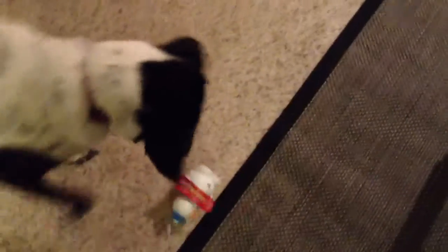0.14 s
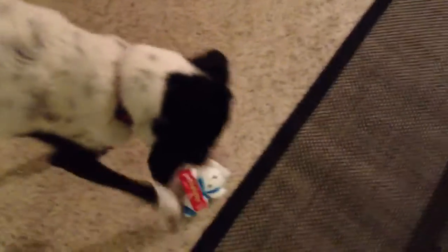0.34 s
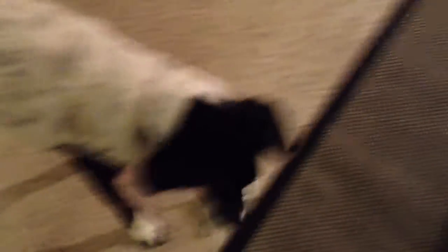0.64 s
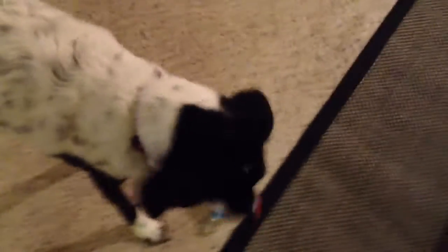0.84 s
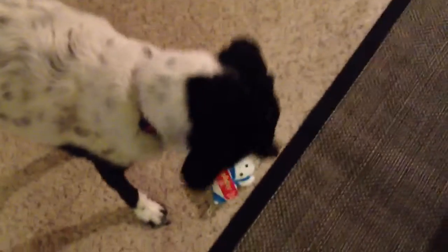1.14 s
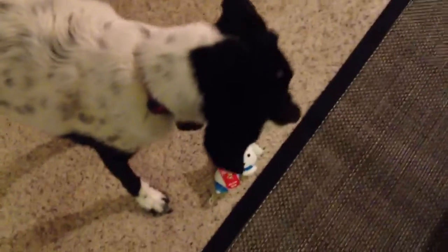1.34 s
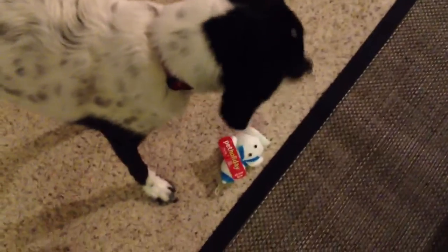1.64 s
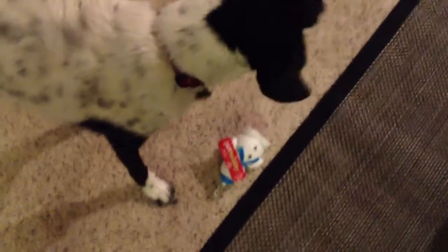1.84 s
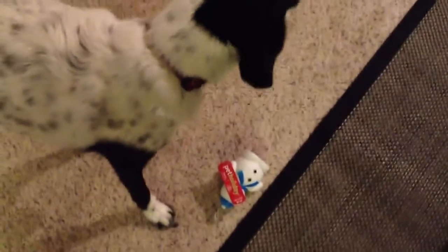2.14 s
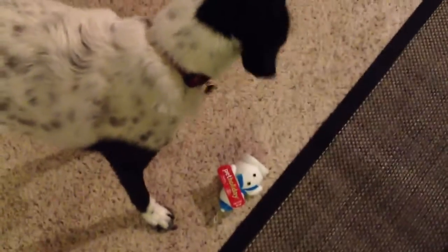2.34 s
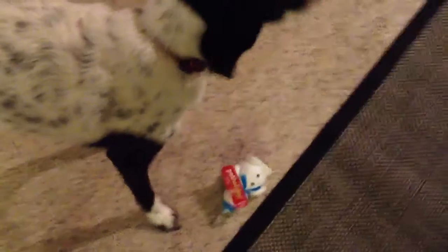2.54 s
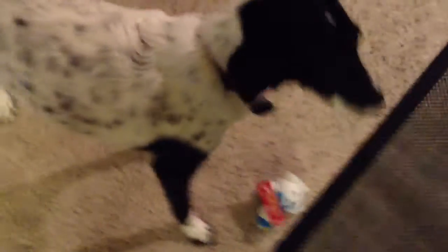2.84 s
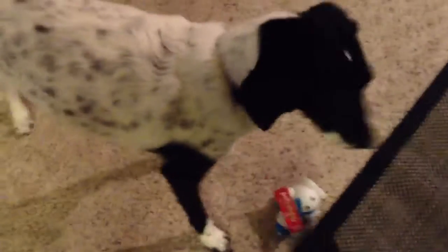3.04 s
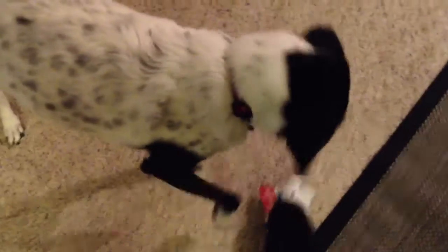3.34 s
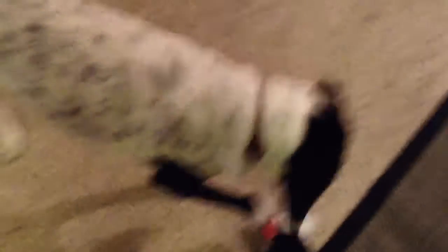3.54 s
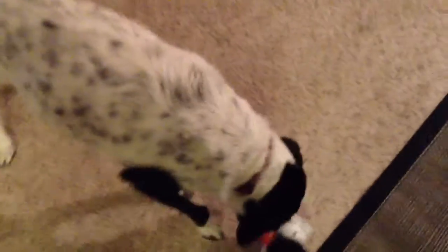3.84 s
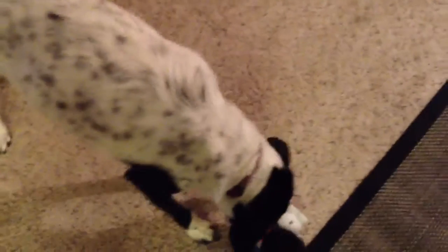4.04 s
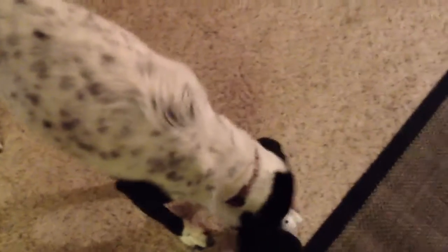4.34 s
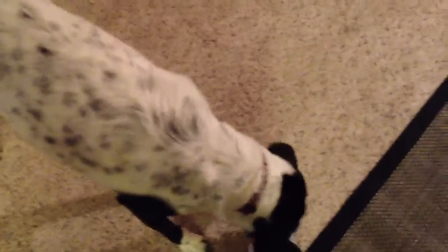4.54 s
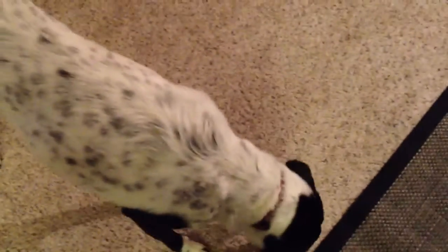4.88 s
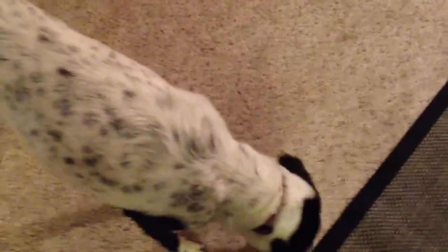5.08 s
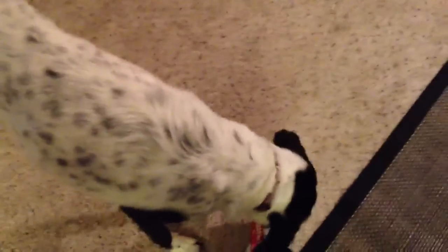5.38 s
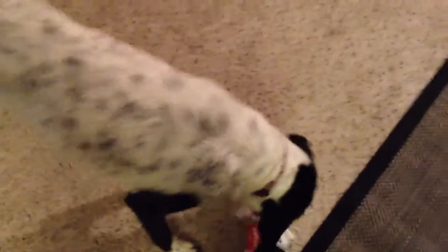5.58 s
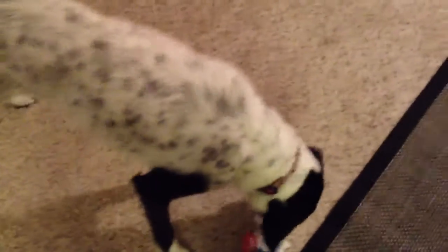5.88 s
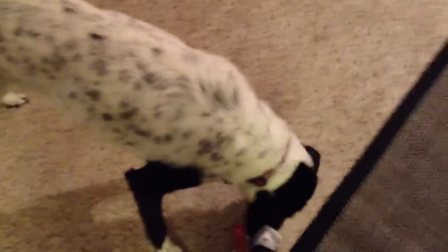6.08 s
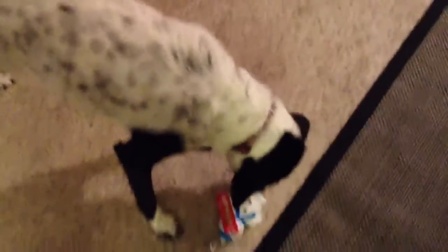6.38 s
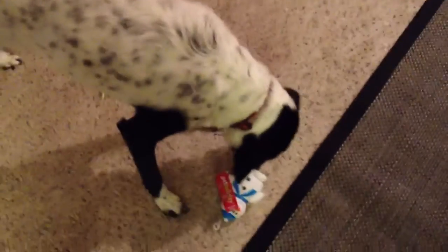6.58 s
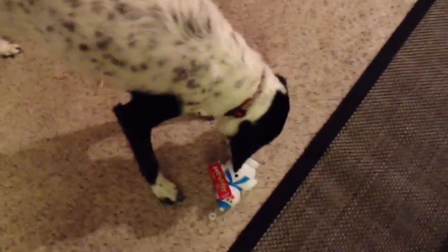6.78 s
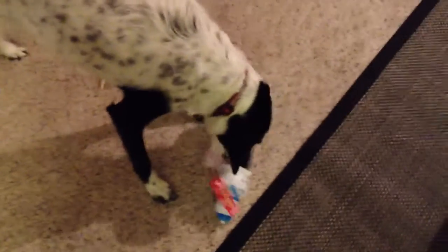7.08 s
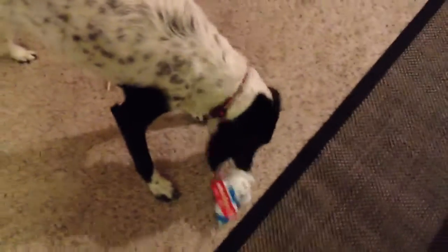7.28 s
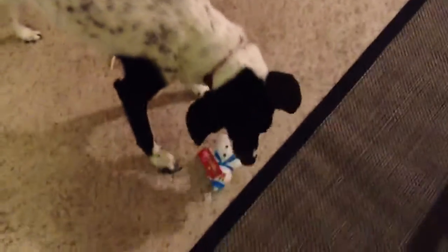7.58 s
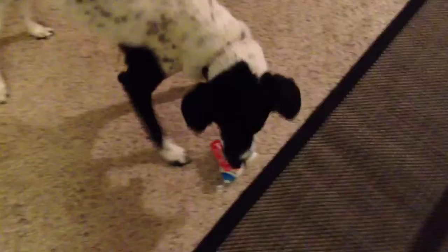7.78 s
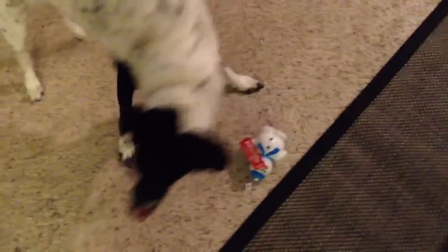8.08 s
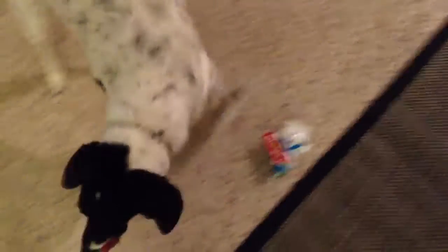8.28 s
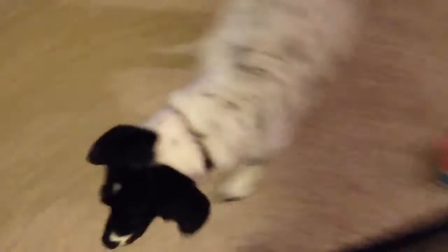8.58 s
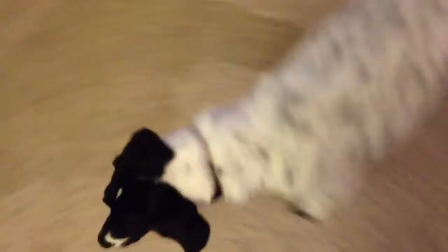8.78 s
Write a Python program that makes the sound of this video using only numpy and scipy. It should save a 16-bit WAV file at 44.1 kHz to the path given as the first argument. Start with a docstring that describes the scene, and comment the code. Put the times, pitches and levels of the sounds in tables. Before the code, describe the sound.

A quiet carpeted living room, heard close on a phone, with a soft low fan hum throughout and a short room echo. At 0 s the tail of a toy squeak dies away. From 0.8 s collar tags clink lightly and a dog whines: a longer, louder, cracking call at 0.9-1.2 s, then falling whines near 1.5, 2.0 and 2.5 s and a weaker one at 2.9 s. Most begin with a thin nasal whistle around 3 kHz before dropping into voice. Tags tinkle between them until 3.1 s. From 3.2 to 6.2 s a plastic squeaker is chewed in quick uneven bursts, outward squeals alternating with inward peeps, pausing around 4.5-4.8 s; a whine overlaps at 4.9 s. The last inward squeak sings at 6.0 s. Tiny whimpers follow at 6.5 and 6.8 s, longer ones at 7.2 and 7.8 s, and a brighter rough pair at 8.1-8.4 s, with soft huffs, rustle and faint tag clinks to the end.

```python
"""The tail of a toy's squeak opens over a quiet house hum; then collar tags clink and a dog starts to whine.
Most whines open as a thin nasal whistle and break into a lower voice with a strong fundamental and cracks.
The toy is squeezed again and again: its reed squeals on presses and sings as air is drawn back in.
Tags are short noise over ringing modes; huffs and coat rustle are swells of noise.
Dog and toy sit in a carpeted living room, with early reflections and a diffuse tail."""
import sys
import numpy as np
from scipy import signal
from scipy.fft import rfft, irfft
from scipy.io import wavfile

SR = 44100
rng = np.random.default_rng(int(sys.argv[2]) if len(sys.argv) > 2 else 0)


def unload_wav(signal):
    """Save mono or channel-first audio to the path in sys.argv[1] as 16-bit WAV at rate SR, clipped to [-1, 1]."""
    wavfile.write(
        sys.argv[1],
        SR,
        np.round(np.clip(np.atleast_2d(signal).T, -1, 1) * 32767).astype(np.int16),
    )


N = 393372
T = np.arange(N) / SR


def undb(db):
    """Decibels to gain."""
    return 10 ** (np.asarray(db) / 20)


def rms(x):
    """Root mean square, kept above zero."""
    return np.sqrt(np.mean(x ** 2)) + 1e-12


def colour(hz, points):
    """Gain at the given frequencies, from (f/Hz, level/dB) points joined on a log frequency axis."""
    f, db = np.transpose(points)
    return undb(np.interp(np.log(hz + 1), np.log(f), db))


def noise(points, size):
    """Noise of unit RMS with the given spectral shape."""
    spectrum = rfft(rng.standard_normal(size))
    x = irfft(spectrum * colour(np.fft.rfftfreq(size, 1 / SR), points), size)
    return x / rms(x)


def wander(t, rate):
    """Random wavering: straight lines between normal random values, `rate` of them a second."""
    values = rng.standard_normal(2048)
    return np.interp((t - t[0]) * rate, np.arange(len(values)), values)


def gate(t, start, end, attack, release):
    """Smooth opening from the start and closing after the end."""
    opened = np.minimum((t - start) / attack, 1 + (end - t) / release)
    return np.sin(np.pi / 2 * np.clip(opened, 0, 1)) ** 2


def note(start, length, attack, release):
    """Sample span, times, gate and progress (0 to 1) of one call."""
    onset = start - attack / 2
    span = (T > onset) & (T < start + length + release)
    t = T[span]
    progress = np.clip((t - start) / length, 0, 1)
    return span, t, gate(t, onset, start + length, attack, release), progress


def phase_of(hz):
    """Running phase of a moving pitch."""
    return 2 * np.pi * np.cumsum(hz) / SR


def arc(u, first, middle, last):
    """Smooth bow through three values as u runs from 0 to 1."""
    return first * (1 - u) * (1 - 2 * u) + middle * 4 * u * (1 - u) + last * u * (2 * u - 1)


# quiet of the house, spectral shape: [f/Hz, relative level/dB]
HOUSE_COLOUR = [(25, -31), (60, -26.5), (100, -20), (125, -9.5), (240, -1), (300, -7), (400, -12.5),
                (520, -14), (700, -15), (1800, -20.5), (5000, -24.5), (7500, -23.5), (10000, -32),
                (14500, -26)]
# hum of a running fan: [f/Hz, level/dB]
FAN_HUM = [(120, -81.5), (150, -73.5), (173, -69.5)]


def house(air_db=-63.5, air_waver_db=2.1):
    """Moving air as shaped noise, plus fan tones whose level and phase waver at random."""
    hum = np.zeros(N)
    for hz, db in FAN_HUM:
        sine_part = wander(T, 24) * np.sin(2 * np.pi * hz * T)
        cosine_part = wander(T, 13) * np.cos(2 * np.pi * hz * T)
        hum += undb(db) * (sine_part + cosine_part)
    return noise(HOUSE_COLOUR, N) * undb(air_db + air_waver_db * wander(T, 6)) + hum


# the toy refills: [start t/s, rise t/s, fall t/s, first f/Hz, top f/Hz, last f/Hz, level/dB before the mix]
TOY_REFILLS = [ (-.060, 0.038, 0.094, 1150, 1233, 907, -26), (3.695, 0.043, 0.056, 1110, 1171, 1044, -34.5),
               (3.920, 0.036, 0.13, 1124, 1180, 975, -34), (4.305, 0.038, 0.19, 1100, 1237, 942, -31),
               (4.980, 0.016, 0.043, 1070, 1125, 1045, -37.5), (5.145, 0.01, 0.021, 950, 1050, 960, -58),
               (5.295, 0.0083, 0.05, 1100, 1120, 1000, -38.5),
               (5.437, 0.016, 0.029, 1110, 1146, 986, -35.5),
               (5.600, 0.017, 0.012, 1074, 1064, 1060, -39.5), (5.735, .015, 0.02, 940, 950, 930, -56),
               (5.998, 0.045, 0.22, 1129, 1251, 925, -30)]
# presses of the toy: [same columns as the refills]
TOY_PRESSES = [ (3.240, 0.022, 0.015, 848, 942, 872, -41), (3.557, 0.046, 0.049, 959, 1105, 899, -28),
               (3.803, 0.042, 0.042, 978, 1150, 931, -26.5), (4.088, 0.035, 0.066, 990, 1399, 854, -24),
               (4.215, 0.037, 0.034, 970, 1028, 949, -32.5), (4.852, 0.036, 0.053, 995, 1072, 886, -29.5),
               (5.055, 0.029, 0.033, 984, 1029, 908, -32), (5.208, 0.029, 0.039, 973, 1065, 892, -31.5),
               (5.375, 0.0065, 0.012, 920, 945, 840, -37.5), (5.502, 0.039, 0.033, 962, 1119, 909, -28),
               (5.652, 0.024, 0.023, 986, 1024, 910, -30), (5.797, 0.013, 0.021, 1046, 998, 912, -32),
               (5.904, 0.047, 0.029, 1016, 1161, 994, -25)]
# overtone colour of the squeaker, blown inwards: [f/Hz, level/dB]
INWARD_COLOUR = [(1100, -7), (2400, -9), (3600, -8.5), (4700, -7), (5900, -15), (7100, -0.5), (8400, -1.5),
                 (9500, -2), (10700, -7.5), (11800, -20.5), (13000, -14), (15500, -26.5)]
# overtone colour of the squeaker, blown outwards: [f/Hz, level/dB]
OUTWARD_COLOUR = [(1000, -9.5), (2100, -16), (3200, -11.5), (4300, -5.5), (5300, -8), (6500, 3.5),
                  (7500, -2.5), (8700, -6.5), (10000, -15.5), (11000, -13.5), (11800, -25), (13500, -23),
                  (15500, -25)]


def squeaker(strokes, points, rise_shape, fall_shape, swell_db, bright_db, flutter, hiss_db,
             uneven_db, force_tilt):
    """A plastic reed: the air pressure of each stroke lifts its pitch, level and brightness together."""
    hiss_colour = [(500, -56), (2500, -23.5), (4500, -5.5), (6700, 2.5), (9000, -3.5), (15000, -26)]
    out = np.zeros(N)
    for start, rise, fall, first_hz, top_hz, last_hz, db in strokes:
        top = start + rise
        span = (T >= start) & (T < top + fall + .01)
        t = T[span]
        rising = t < top
        rise_slack = (abs(top - t) / rise) ** rise_shape
        fall_slack = (abs(t - top) / fall) ** fall_shape
        slack = np.where(rising, rise_slack, fall_slack)
        hz = top_hz - slack * (top_hz - np.where(rising, first_hz, last_hz))
        # pressure lost against the top of the stroke
        sag = np.minimum(slack, 1) * np.where(rising, .6, 1)
        # the reed starts clean, then flutters in the turbulent flow
        unsteady = np.minimum((t - start) / .05, 1)
        phase = phase_of(hz * (1 + flutter * unsteady * wander(t, 700)))
        reed = 0
        for k in range(1, 15):
            # the reed's swing is limited: a harder stroke feeds the upper overtones more than the lowest
            force_db = force_tilt * (db + 23) * min(np.log2(k / 5), 0)
            partial_db = uneven_db * wander(t, 43.3) - bright_db * sag * np.log2(k) + force_db
            partial = np.sin(k * phase + rng.uniform(0, 2 * np.pi))
            reed = reed + colour(k * hz, points) * undb(partial_db) * partial
        hiss = undb(hiss_db) * unsteady * noise(hiss_colour, len(t))
        opening = gate(t, start - .001, top + fall, .005, .01)
        out[span] += opening * undb(db - swell_db * sag) * (reed + hiss)
    return out


# collar tags touch: [t/s, level/dB before the gain]
TAG_TOUCHES = [(0.7775, -48.5), (0.861, -58), (1.04, -43), (1.1227, -41.5), (1.407, -60), (1.6125, -44),
               (1.7315, -53), (1.8267, -48), (2.3284, -45), (2.7285, -41.5), (2.9756, -52.5), (3.0614, -52),
               (3.1358, -58), (4.754, -57), (7.049, -61), (7.432, -53), (7.6655, -56), (8.445, -48.5),
               (8.8964, -51)]
# ringing modes of the tags: [f/Hz, level/dB, 60 dB decay t/s]
TAG_RING = [(6400, -8, .08), (7150, -4, .08), (8150, -4, .08), (9050, -4, .1), (10100, -2, .12),
            (11200, -9, .07), (12200, 0, .13), (13600, -11, .07), (14900, -7, .07)]


def tags(gain_db, tick_db, tick_s=0.014, touch_s=0.0013):
    """Small metal tags: a short scrape of noise and a few decaying high modes share a softened onset."""
    tick_colour = [(1000, -36.5), (4000, -6.5), (8000, 14), (15000, -1)]
    out = np.zeros(N + SR)
    t = T[:SR // 5]
    for s, db in TAG_TOUCHES:
        ring = 0
        for hz, mode_db, t60 in TAG_RING:
            # each touch excites the modes unequally
            decay_db = mode_db + 5.3 * rng.standard_normal() - 60 * t / t60
            ring = ring + undb(decay_db) * np.sin(2 * np.pi * hz * t)
        tick = noise(tick_colour, len(t)) * np.exp(-t / tick_s)
        hit = (ring / 2 + undb(tick_db) * tick) * (1 - np.exp(-t / touch_s))
        first = int(s * SR)
        out[first:first + len(t)] += undb(db + gain_db) * hit
    return out[:N]


# thin whistling lines of the whines, levels before swell and mix:
# [start t/s, length t/s, first f/Hz, middle f/Hz, last f/Hz, fundamental level/dB, upper partials level/dB]
WHISTLE_LINES = [ (0.783, 0.1, 3527, 3600, 3473, -56.5, -62), (0.937, 0.22, 3975, 4010, 3620, -56.5, -68.5),
                 (1.403, 0.088, 3250, 3500, 3420, -52.5, -51), (1.863, 0.12, 3120, 3295, 3305, -56, -53),
                 (2.334, 0.14, 3047, 3325, 3193, -53.5, -49), (2.825, 0.11, 3166, 3260, 3250, -57, -54),
                 (2.963, 0.31, 3180, 3320, 3410, -75, -83), (6.512, 0.036, 3366, 3410, 3310, -61.5, -85),
                 (6.739, 0.098, 3210, 3415, 3290, -60.5, -78), (7.19, 0.031, 3450, 3540, 3570, -52.5, -86),
                 (7.71, 0.058, 3370, 3465, 3320, -54.5, -55.5), (7.79, 0.023, 4520, 4290, 4280, -51.5, -75),
                 (8.12, 0.058, 3440, 3400, 3330, -57, -80), (8.211, 0.056, 3550, 3540, 3580, -48.5, -85),
                 (8.293, 0.1, 3620, 3600, 3795, -52.5, -63)]


def whistle(jitter=0.005, third_db=-15, fourth_db=-17):
    """Thin, high whistling lines of a whine; those at 0.937 and 7.79 s lie near the voice's fifth harmonic."""
    out = np.zeros(N)
    for start, length, first_hz, middle_hz, last_hz, db, upper_level_db in WHISTLE_LINES:
        span, t, opening, u = note(start, length, attack=0.0037, release=0.011)
        hz = arc(u, first_hz, middle_hz, last_hz)
        swell = undb(-arc(u, 5.55, 0, 6.975))  # dB quieter at the start and end than in the middle
        phase = phase_of(hz * (1 + jitter * wander(t, 221.5)))
        upper = np.sin(2 * phase) + undb(third_db) * np.sin(3 * phase)
        upper = upper + undb(fourth_db) * np.sin(4 * phase)
        out[span] += opening * swell * (undb(db) * np.sin(phase) + undb(upper_level_db) * upper)
    return out


# whines, levels before the mix: [start t/s, length t/s, attack t/s, first f/Hz, middle f/Hz, last f/Hz,
# catch at the onset f/Hz, final drop f/Hz, fundamental level/dB, fade over the note level/dB,
# push t/s, push level/dB, overtones level/dB before a trim, brightness level/dB per octave]
DOG_WHINES = [ (0.872, 0.3, 0.022, 764, 808.2, 723, 78, 223, -33.5, 2, 1.02, 14, -45.5, -5.5),
              (1.497, 0.13, 0.011, 997, 757, 440, 0, 3, -34.5, -2.5, 1.505, 8, -49, -3),
              (1.955, 0.157, 0.015, 943, 738, 452, 1.5, -5.5, -36, 9, 2.09, 12.5, -47, -4.5),
              (2.459, 0.17, 0.012, 965, 661.5, 424.3, 21.5, 5, -34, -6, 2.485, 8.5, -49.5, -1),
              (2.913, 0.24, 0.011, 641, 573, 537, 183, 15.5, -43, 5, 3.09, 11.5, -58, -0.5),
              (4.873, 0.18, 0.02, 558.6, 559.7, 505, -150, 78, -44, 5, 4.92, 11.5, -56.5, -1.5),
              (6.51, 0.021, 0.012, 558, 553, 567, 6, 7, -63, 1, 6.522, 6, -89, 2),
              (6.836, 0.042, 0.0139, 543, 535, 519, 0, 2, -49.5, 0, 6.855, 1.5, -72.5, 4),
              (7.229, 0.22, 0.061, 708, 494.5, 409.6, -10, -4.5, -41.5, 8, 7.275, 1.5, -60.5, -1.5),
              (7.794, 0.24, 0.016, 755.5, 656.5, 590, 201, 2, -41.5, 11, 7.95, 11, -50.5, -0.5),
              (8.143, 0.041, 0.012, 636, 606, 648, 71, 3.5, -35, -3, 8.17, 3.5, -50, -5.5),
              (8.236, 0.124, 0.005, 693, 664.8, 722.4, 2, 0, -41.5, -6.5, 8.245, 8.5, -43.5, -7)]
# the voice cracks: [centre t/s, bell half width t/s, roughness 0-1]
VOICE_CRACKS = [(0.971, 0.015, 0.4), (1.108, 0.013, .3), (1.153, 0.0051, 0.2), (1.181, 0.022, 0.6),
                (1.62, 0.024, 0.34), (2.09, 0.0091, 0.5), (2.567, 0.013, 0.13), (2.634, 0.011, 0.31),
                (3.14, 0.012, 0.17), (7.42, 0.035, 0), (8.244, 0.0056, 0.7), (8.303, 0.012, 0.4),
                (8.35, 0.012, 0.83)]
# muzzle colour of the overtones and breath: [f/Hz, level/dB]
MUZZLE_COLOUR = [(100, -50), (350, -13.5), (700, 6), (1020, 4.5), (1250, -3), (1550, -2.5), (2050, -6),
                 (2600, -7), (3300, -13), (4300, -7.5), (5500, -17.5), (7400, -9.5), (9000, -28),
                 (14000, -41)]


def voice(jitter=0.0089, crack_jitter=0.056, half_db=2.5, air_db=-25, uneven_db=5, thin_db=7,
          dull_db=3, shimmer_db=7):
    """Vocal folds in falsetto: a strong fundamental, weak overtones, and period doubling in the cracks."""
    catch_s, drop_s, push_s = .012, .02, .024  # time scales of throat catch, final pitch drop and push
    push_overtone_share = 0.31  # share of a push, in dB, that the overtones follow
    breathy_hz = 7200  # an overtone here wavers in phase by about a radian
    out = np.zeros(N)
    for (start, length, attack, first_hz, middle_hz, last_hz, catch_hz, drop_hz, level_db, fade_db,
         push_at, push_db, upper_db, bright_db) in DOG_WHINES:
        span, t, opening, u = note(start, length, attack, release=0.006)
        # the catch in the throat settles; the pitch bends at the end as the breath runs out
        catch = catch_hz * np.exp(-u * length / catch_s)
        drop = drop_hz * np.exp((u - 1) * length / drop_s)
        hz = arc(u, first_hz, middle_hz, last_hz) + catch - drop
        push = push_db * np.exp(-((t - push_at) / push_s) ** 2)
        db = level_db - fade_db * (u - .5) + push
        # the mouth opens mid-whine: overtones are 2.5 dB weaker at the start and 1 dB at the end
        overtone_db = upper_db - 2.5 + push_overtone_share * push - arc(u, 2.5, 0, 1)
        mouth_db = bright_db + 12.5 * np.log2(hz / middle_hz)  # duller as the pitch falls
        rough = sum(amount * np.exp(-((t - s) / width) ** 2) for s, width, amount in VOICE_CRACKS)
        height = np.maximum(np.log2(hz / 520), 0)  # the higher the note, the nearer it is to a pure tone
        hz = hz * (1 + jitter * wander(t, 126.3) + crack_jitter * rough * wander(t, 500))
        phase = phase_of(hz)
        overtones = 0
        for k in range(2, 15):
            # each overtone comes and goes as the head and lips move
            partial_db = uneven_db * wander(t, 42.2) - height * (thin_db + dull_db * np.log2(k / 2))
            # an open mouth lets the treble out
            partial_db = partial_db + mouth_db * np.log2(k * hz / 1800)
            # the highest overtones dissolve into breath
            smear = (k * hz / breathy_hz) ** 2 * wander(t, 500)
            partial = np.sin(k * phase + smear)
            overtones = overtones + colour(k * hz, MUZZLE_COLOUR) * undb(partial_db) * partial
        # period doubling: odd multiples of half the pitch
        halves = 0
        for k in range(1, 9, 2):
            half_gain = colour(k * hz / 2, MUZZLE_COLOUR) * min(1, (3 / k) ** 2)
            halves = halves + half_gain * np.sin(k * phase / 2)
        air = (undb(-3) * rough + undb(air_db)) * noise(MUZZLE_COLOUR, len(t))
        upper = overtones + undb(half_db) * rough * halves + air
        shimmer = undb(shimmer_db * rough * wander(t, 200))
        out[span] += opening * shimmer * (undb(db) * np.sin(phase) + undb(overtone_db) * upper)
    return out


# the dog's huffs and the rustle of its coat:
# [centre t/s, bell half width t/s, centre f/Hz, level/dB before the mix]
DOG_HUFFS = [(1.782, 0.045, 2010, -77), (2.238, .04, 2300, -74), (7.978, 0.14, 6200, -65),
             (8.354, .05, 7050, -58.5), (8.835, 0.27, 12000, -69)]


def huffs():
    """Soft, broad swells of air and fur noise."""
    out = np.zeros(N)
    for s, width, hz, db in DOG_HUFFS:
        span = abs(T - s) < 3 * width
        swell = np.exp(-((T[span] - s) / width) ** 2)
        points = [(hz / 20, -40), (hz / 2, -6), (hz, 0), (hz * 2, -14), (hz * 10, -40)]
        out[span] += undb(db) * swell * noise(points, span.sum())
    return out


# first reflections from floor, couch and walls: [delay t/s, level/dB]
EARLY_ECHOES = [(.0031, -33), (.0083, -10), (.0137, -17.5), (.0212, -13)]
# reverberation of the room: [f/Hz, 60 dB decay t/s]
ROOM_DECAY = [(300, 0.33), (800, 0.46), (3000, 0.43), (7000, 0.41), (14000, 0.25)]


def room(x, spill, build_s=0.0029):
    """Direct sound, a few early reflections and a diffuse tail with its own decay in each band."""
    t = T[:int(SR * .8)]
    f = np.fft.rfftfreq(len(t), 1 / SR)
    spectrum = rfft(rng.standard_normal(len(t))) * colour(f, spill)
    centres, t60s = np.transpose(ROOM_DECAY)
    response = np.zeros(len(t))
    for row, t60 in zip(np.eye(len(centres)), t60s):
        band = np.interp(np.log(f + 1), np.log(centres), row)  # overlapping triangles
        shape = np.exp(-np.log(1000) * t / t60) * (1 - np.exp(-(t / build_s) ** 2))
        response += irfft(spectrum * band, len(t)) * shape / np.linalg.norm(shape)
    response[0] += 1  # direct sound
    for delay, db in EARLY_ECHOES:
        response[int(delay * SR)] += undb(db)
    return signal.fftconvolve(x, response)[:N]


# the squeaker throws its treble sideways, so its reverberation is brighter: [f/Hz, level/dB]
TOY_REVERB = [(1000, 1), (2500, -2), (4300, 5.5), (6500, 4.5), (8000, 2), (10000, 0.5), (14000, -0.5)]
# reverberant share of the dog's sounds: [f/Hz, level/dB]
DOG_REVERB = [(500, -6.5), (1000, -4.5), (3000, -1.5), (7000, 4), (12000, -10)]


def scene():
    """Dog and toy in the room, over the low hum of the house."""
    refills = squeaker(TOY_REFILLS, INWARD_COLOUR, rise_shape=1.8, fall_shape=1.7, swell_db=17.5,
                       bright_db=2, flutter=.003, hiss_db=-32.5, uneven_db=3.5, force_tilt=0.039)
    presses = squeaker(TOY_PRESSES, OUTWARD_COLOUR, rise_shape=1.8, fall_shape=1.9, swell_db=7.5,
                       bright_db=1.57, flutter=.009, hiss_db=-21, uneven_db=2.5, force_tilt=0.08)
    toy = room(undb(-2) * (presses + refills), TOY_REVERB)
    whines = undb(1) * voice() + undb(1.5) * whistle()
    body = undb(-2.5) * huffs() + tags(gain_db=-7, tick_db=0)
    dog = room(whines + body, DOG_REVERB)
    return (toy + dog + house())[None]


def record(dry):
    """The phone cuts off the highest treble: a steep low-pass at 15450 Hz."""
    return signal.sosfilt(signal.ellip(10, .2, 80, 15450, fs=SR, output="sos"), dry)


dry = scene()
out = record(dry)
unload_wav(out)
```